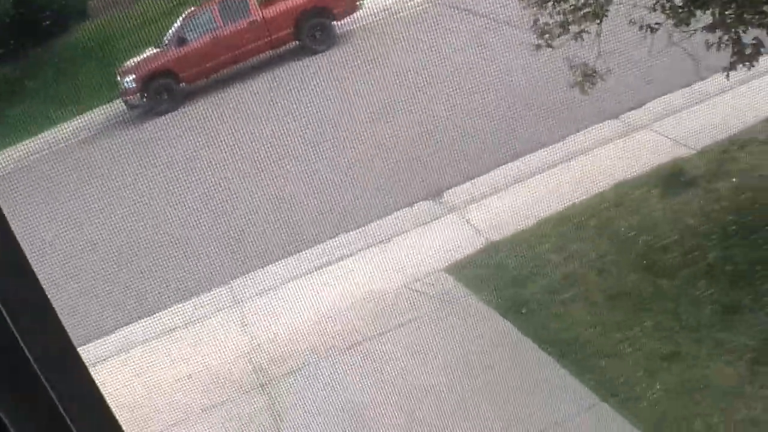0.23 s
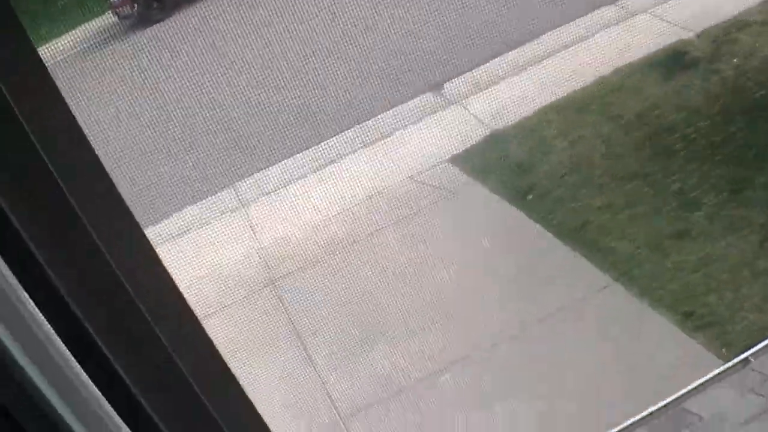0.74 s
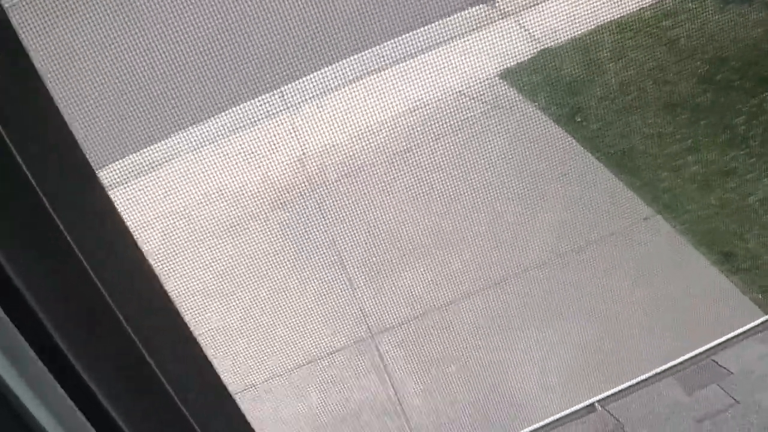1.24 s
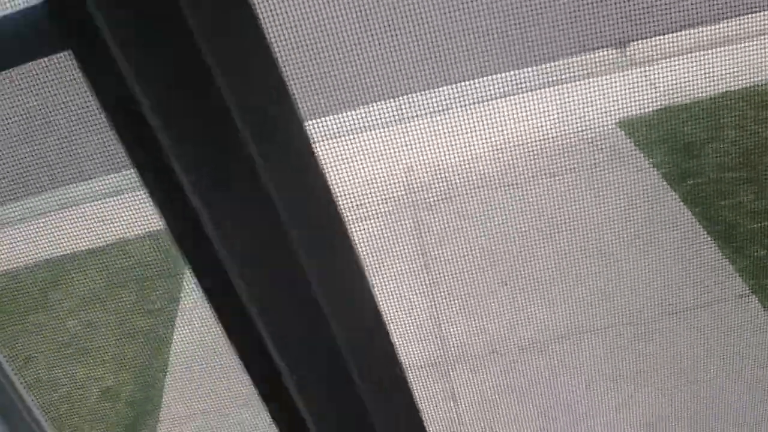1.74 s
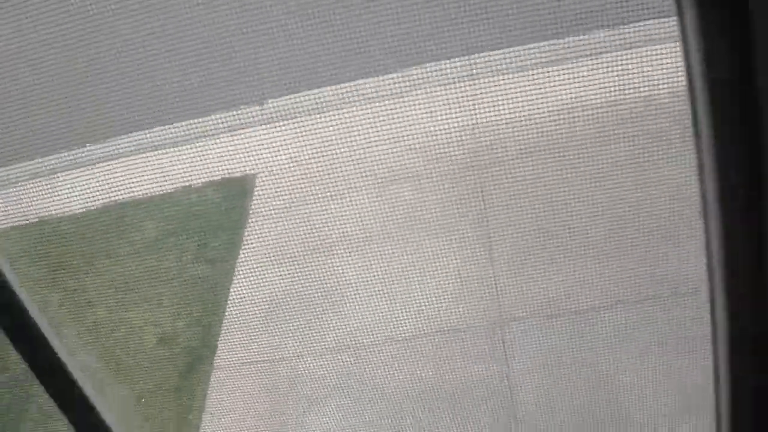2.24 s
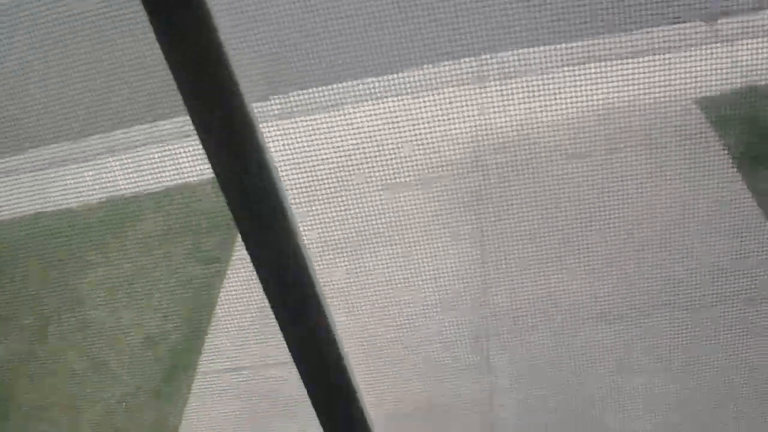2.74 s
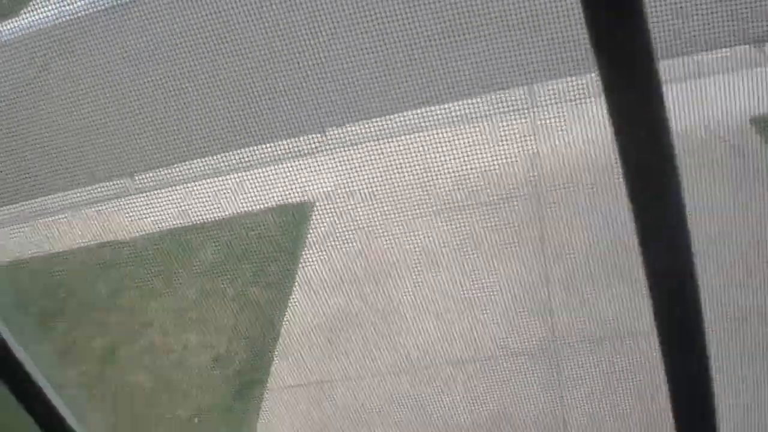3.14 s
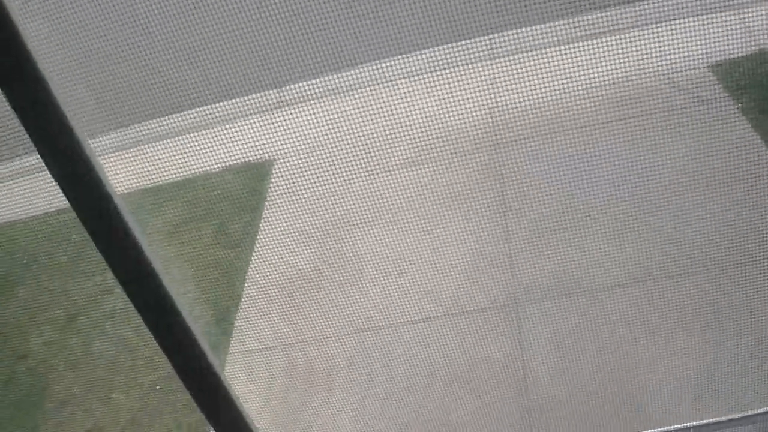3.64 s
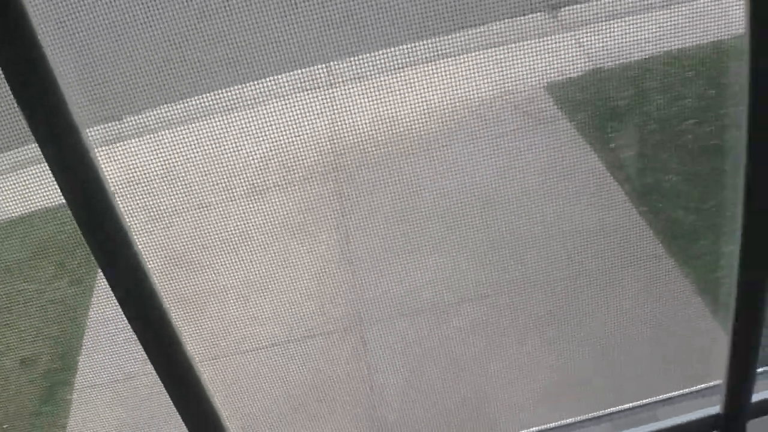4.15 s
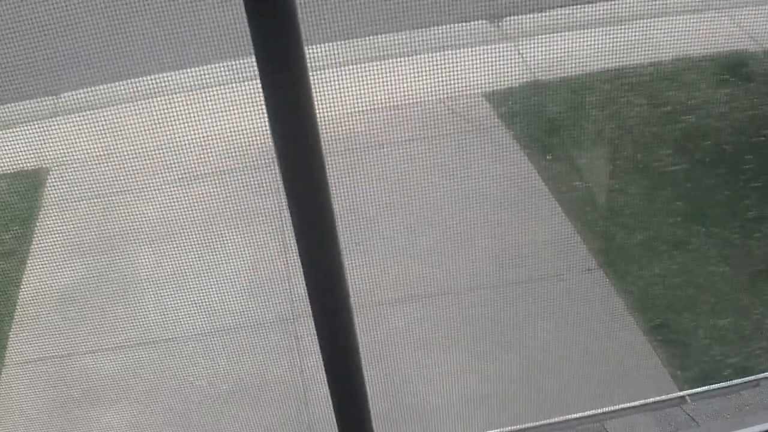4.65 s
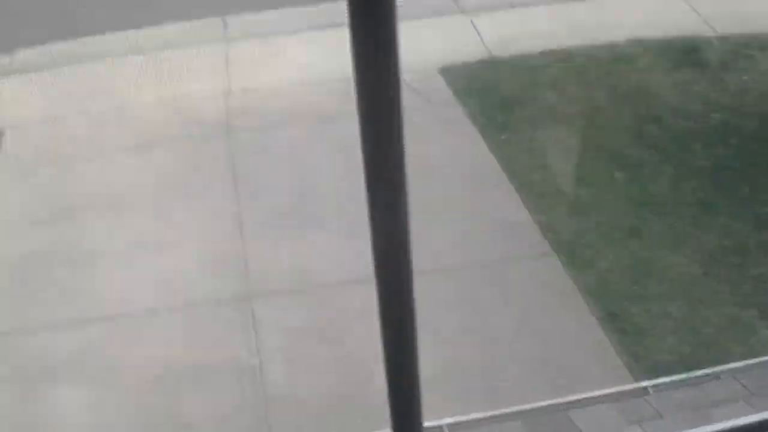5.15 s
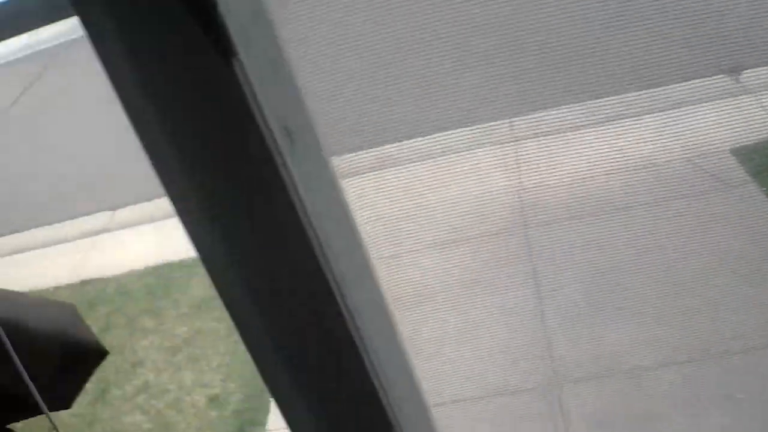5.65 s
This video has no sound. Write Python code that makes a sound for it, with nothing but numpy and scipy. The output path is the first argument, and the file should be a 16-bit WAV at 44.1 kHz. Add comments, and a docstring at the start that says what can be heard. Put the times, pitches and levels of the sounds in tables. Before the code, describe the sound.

A window sash hisses along its track with light clicks, bangs shut hard enough to distort, then its latch squeaks and clacks in an echoing room.

```python
"""A window sash rubs along its track as friction noise and bangs shut, and its latch is turned.
Knocks and ticks are dying noise bursts that excite the modes of the sash; the latch plate rings too.
Stick-slip friction makes the squeak of the lever and the brushing of the fingers.
A bare room echoes these sounds by sparse reflections, and the bang overloads the microphone.
Behind them lie a street murmur that sinks after the bang, a faint drone, a low rumble and hiss."""
import sys
import numpy as np
from scipy import signal
from scipy.fft import rfft, irfft, next_fast_len
from scipy.io import wavfile
from scipy.ndimage import uniform_filter1d

SR = 44100
rng = np.random.default_rng(int(sys.argv[2]) if len(sys.argv) > 2 else 0)


def generate_wav(sig):
    """Save sig (samples, or channels by samples) to the path in sys.argv[1] as 16-bit PCM at SR."""
    pcm = np.round(np.clip(np.atleast_2d(sig).T, -1, 1) * 32767).astype(np.int16)
    wavfile.write(sys.argv[1], SR, pcm)


N = 260756  # length [samples]

# Rub of the sash in its track: (time [s], gain [dB])
RUB = [(1.45, -54), (1.62, -41.5), (1.71, -42.5), (1.755, -48.5), (1.79, -41), (1.93, -41.5), (2.1, -42),
       (2.45, -45.5), (2.8, -43.5), (3.001, -43), (3.1, -46.5), (3.242, -43), (3.361, -42.5)]
# Spectrum of the weather-strip rub: (frequency [Hz], relative density [dB])
TRACK_SPECTRUM = [(590, -28), (1000, -3), (1800, -2), (1950, 2), (2240, 2.5), (3250, 4), (5530, 2),
                  (7860, -11), (13700, -20), (15000, -37)]
# Spectrum of the rumbling frame: (frequency [Hz], relative density [dB])
FRAME_SPECTRUM = [(59, -60), (100, -29), (157, -16), (301, -5), (479, -2), (564, -6), (734, -2.5),
                  (2000, -11.5), (2600, -39.5), (4400, -120)]
FRAME_GAIN_DB = -49.5
# The brightest band sinks along the track and wanders by an rms share of its frequency
BRIGHT_START_HZ, BRIGHT_SAG_HZ_PER_S, BRIGHT_WANDER = 5200, 240, 0.15


def slide():
    """Sliding friction: broadband rub and grit slips with a wandering bright band; the frame rumbles along."""
    rub_db, window = curves(RUB)
    start_s, end_s = RUB[0][0], RUB[-1][0]
    moved_s = np.clip(np.arange(N) / SR - start_s, 0, end_s - start_s)
    wander = slow_noise(4000, passes=2)
    bright_hz = (BRIGHT_START_HZ - BRIGHT_SAG_HZ_PER_S * moved_s) * (1 + BRIGHT_WANDER * wander)

    strip = noise(TRACK_SPECTRUM, patchy_db=2.0, flicker_db=0.9)
    track_grit = coloured(grit(per_s=330, spread_db=2.0), TRACK_SPECTRUM)
    rub = strip + 0.1 * track_grit
    rub = evened(rub + 0.42 * resonate(rub, bright_hz, 1300))
    frame = noise(FRAME_SPECTRUM, patchy_db=-0.3, flicker_db=-4.0)
    return window * (gain_of(rub_db) * rub + gain_of(FRAME_GAIN_DB) * frame)


# Knocks that shake the sash: (time [s], crack onset level [dB], centre [Hz],
# distance from centre to -6 dB [octaves], t60 [s], sash excitation [dB])
KNOCKS = [(.707, -21, 980, 1.05, 0.058, -30), (.734, -29, 400, 0.49, 0.14, -38),
          (1.449, -24, 895, 1.08, 0.15, -46), (3.364, -10.5, 1320, 1.06, 0.064, -11.5),
          (3.376, 1, 1269, .6, .1, -6), (3.382, 1, 2370, 0.96, 0.05, -1.5),
          (3.417, -10, 4060, 0.28, 0.062, -5.5), (3.455, -22, 3670, 0.71, 0.09, -9.5),
          (4.407, -45, 2500, 1.3, 0.059, -40), (4.812, -22, 1380, 1.07, 0.029, -32.5),
          (4.828, -9, 2300, 0.99, 0.063, -37), (5.893, -30.5, 726, 1.03, 0.13, -32.5)]
# Light ticks of grit and fittings: (time [s], onset level [dB], centre [Hz],
# distance from centre to -6 dB [octaves])
TICKS = [(0.17, -45.5, 4860, 0.24), (0.279, -52, 3000, 0.23), (0.639, -51, 5770, 0.19),
         (0.675, -47.5, 5600, 0.17), (0.733, -41, 5500, .28), (.911, -46, 5600, .35),
         (1.16, -34.5, 3300, .82), (1.257, -27.5, 4600, 0.36), (1.266, -32, 3700, 0.82),
         (1.288, -29, 3840, 0.76), (1.299, -25.5, 4440, 0.1), (1.448, -15.5, 4250, 0.52),
         (1.606, -33, 1580, 0.22), (1.635, -36, 1680, 0.2), (1.919, -34.5, 5500, 0.21),
         (2.016, -27, 3150, 0.71), (2.062, -28.5, 3670, 0.66), (2.189, -39, 4500, 0.73),
         (2.333, -35.5, 4630, 0.37), (2.535, -34, 1950, 0.56), (2.761, -30.5, 1828, 1),
         (2.825, -35.5, 4450, 0.13), (2.934, -28, 2650, .8), (3.183, -21.5, 3160, 0.82),
         (3.326, -27.5, 3690, 0.49), (3.367, -24, 8300, 0.083), (3.796, -31, 3200, 0.79),
         (4.423, -31, 1444, 0.29), (4.789, -30.5, 1200, 0.43), (5.484, -54.5, 2050, 0.46),
         (5.536, -57, 4950, .48), (5.609, -58, 4970, 0.67), (5.861, -50, 1650, 0.74)]
TICK_T60_S, TICK_RING_DB = 0.057, -25.5  # ticks die fast; sash excitation relative to the tick
# Modes of the sash: (frequency [Hz], relative level [dB], t60 [s])
SASH_MODES = [(97, -34.5, 0.091), (162, -32, 0.12), (202.8, -30, 0.24), (249, -16.5, 0.52),
              (289.8, -16.5, 0.2), (360.8, -6, 0.23), (433.6, -12.5, 0.15), (458, -21, 0.54),
              (558.7, -20, 0.2), (740, -18, 0.091)]
# Lever striking the latch plate: (time [s], plate excitation [dB])
CATCHES = [(4.787, -29), (4.811, -40), (4.828, -18.5)]
# Modes of the latch plate: (frequency [Hz], relative level [dB], t60 [s])
PLATE_MODES = [(275, -14, 0.16), (1120, -9, 0.065), (1214, 0.5, 0.085), (1312, 1, 0.064), (1420, -1, 0.049),
               (1488, -17, 0.039)]
SKIRT_DB, SKIRT_LOW_HZ = -13.5, 400  # body below each blow's band, and its lower corner
BURST_SAMPLES = 4096


def knocks():
    """Impulsive excitation: blows crack as dying noise bands and set sash and latch-plate modes ringing."""
    t, hz = np.arange(BURST_SAMPLES) / SR, np.fft.rfftfreq(BURST_SAMPLES, 1 / SR)
    crack, snap, push, tap = np.zeros((4, N + BURST_SAMPLES))
    ticks = [(*tick, TICK_T60_S, tick[1] + TICK_RING_DB) for tick in TICKS]
    blows = [*KNOCKS, *ticks]
    bursts = rng.standard_normal((len(blows), BURST_SAMPLES))

    for (s, db, centre_hz, octaves, t60, sash_db), burst in zip(blows, bursts):
        at = round(s * SR)
        span = slice(at, at + BURST_SAMPLES)
        distance = np.abs(np.log2((hz + 1) / centre_hz) / octaves)
        band = gain_of(-6 * distance ** 1.69)
        upper_slope = 1 + (hz / centre_hz) ** 4
        lower_slope = 1 + (SKIRT_LOW_HZ / (hz + 1)) ** 2
        band += gain_of(SKIRT_DB) / upper_slope / lower_slope

        attack = np.minimum(t / 0.0009, 1)
        shape = gain_of(db - 60 * t / t60) * attack
        crack[span] += evened(irfft(rfft(burst) * band)) * shape
        # The room is fed the same band as one even pulse, scaled to the energy of the blow
        pulse = np.roll(irfft(band), 128)
        snap[span] += pulse * np.linalg.norm(shape) / np.linalg.norm(pulse)
        push[at] += gain_of(sash_db)

    for s, db in CATCHES:
        tap[round(s * SR)] = gain_of(db)
    sash = signal.oaconvolve(push, ringing(SASH_MODES, spread_s=0.0017, detune=0.021))
    plate = signal.oaconvolve(tap, ringing(PLATE_MODES, spread_s=0.0064, detune=0.019))
    return crack[:N], snap[:N], (sash + plate)[:N]


def ringing(modes, spread_s, detune):
    """Modal superposition: clusters of neighbouring modes die away, building up as bending waves spread."""
    t = np.arange(SR // 2) / SR
    tones = np.zeros(len(t))
    for hz, db, t60 in modes:
        decay = gain_of(db - 60 * t / t60)
        for step in (0, *rng.uniform(-1.0, 1, size=3)):
            partial = np.sin(2 * np.pi * hz * (1 + detune * step) * t)
            tones += decay * partial / (1 + 2 * abs(step))
    return tones * (1 - np.exp(-t / spread_s))


# Each turn of the latch lever is a list of rows: (time [s], squeak gain [dB])
TURNS = [
    [(0, -53), (.08, -63.5), (.2, -67)],
    [(4.39, -78.5), (4.42, -45.5), (4.45, -56.5), (4.58, -61.5), (4.68, -57), (4.725, -62.5), (4.8, -45),
     (4.83, -38)],
]
# Upper resonances of the lever: (frequency [Hz], width [Hz], relative gain [dB])
RASP = [(2415, 44, 6), (3260, 73, 7.5), (4000, 110, 0.5), (5250, 180, 8)]
SQUEAK_HZ, SQUEAK_WIDTH_HZ = 1544, 33  # lowest resonance of the lever
SCRAPE_HZ, SCRAPE_WIDTH_HZ, SCRAPE_DB = 3800, 2200, -6.5  # broad scrape under the rasp
# The rasp gains on the squeak as the lever tightens
RASP_START_DB, RASP_RISE_DB_PER_S = -5.5, 29


def latch():
    """Stick-slip: slips under the turning lever excite its resonances over a dull scrape."""
    out, slips = np.zeros(N), grit(per_s=1500, spread_db=-0.5)
    waver = 1 + 0.0073 * slow_noise(2000)  # contact pressure shifts the pitches
    squeak = evened(resonate(slips, SQUEAK_HZ * waver, SQUEAK_WIDTH_HZ))
    dull_scrape = evened(resonate_twice(slips, 1220, 1800))
    squeak += 1.3 * dull_scrape

    rasp = np.zeros(N)
    for k, (hz, width, db) in enumerate(RASP):
        rasp += (-1) ** k * gain_of(db) * resonate(slips, hz * waver, width)
    broad_scrape = resonate(grit(per_s=1400, spread_db=1.5), SCRAPE_HZ, SCRAPE_WIDTH_HZ)
    rasp = evened(rasp) + gain_of(SCRAPE_DB) * evened(broad_scrape)

    for rows in TURNS:
        squeak_db, window = curves(rows)
        turned_s = np.clip(np.arange(N) / SR - rows[0][0], 0, 1)
        rasp_gain = gain_of(RASP_START_DB + RASP_RISE_DB_PER_S * turned_s)
        out += window * gain_of(squeak_db) * (squeak + rasp_gain * rasp)
    return out


# Fingers brushing the frame: (start [s], swell [s], fade [s], top gain [dB], centre [Hz])
BRUSHES = [(0, .01, 0.37, -57, 4400), (.62, 0.16, .05, -58.5, 5370), (3.76, 0.15, 0.041, -45.5, 5530),
           (4.41, 0.11, 0.15, -54, 4900)]
BRUSH_START_DB, BRUSH_END_DB = -3, -25  # relative to the top


def fingers():
    """Skin friction: fine slips fill one broad high band that swells and fades."""
    out, slips = np.zeros(N), grit(per_s=1600, spread_db=2.0)
    for start, swell, fade, top_db, hz in BRUSHES:
        top_s = start + swell
        db, window = curves([(start, BRUSH_START_DB), (top_s, 0), (top_s + fade, BRUSH_END_DB)])
        out += window * gain_of(top_db + db) * evened(resonate_twice(slips, hz, 3300))
    return out


# Decay of the room: (frequency [Hz], t60 [s])
ROOM_DECAY = [(100, 0.42), (350, 0.51), (1200, 0.67), (3500, 0.7), (7000, 0.56), (12000, 0.53)]
# Colour that the window recess gives the echo: (frequency [Hz], relative level [dB])
RECESS = [(300, 5.5), (800, 5), (1300, 1.5), (2500, -2), (3400, 0), (5200, 2.5), (6500, 1), (12000, -8)]


def room(x):
    """Reverberation: sparse reflections of random sign decay at a rate set by frequency."""
    taps = np.zeros(SR)
    at = np.arange(300, SR - 12, 12)  # one reflection in every 12 samples
    taps[at + rng.integers(0, 12, len(at))] = rng.choice([-1., 1.], len(at))
    hz, t, z = signal.stft(taps, SR, nperseg=256)
    colour_db = read(RECESS, hz)[:, None]
    decay_db = 60 * t / read(ROOM_DECAY, hz)[:, None]
    tail = signal.istft(z * gain_of(colour_db - decay_db), SR, nperseg=256)[1]
    return signal.fftconvolve(x, tail / np.linalg.norm(tail))[:N]


# Spectrum of the street murmur: (frequency [Hz], relative density [dB])
STREET_SPECTRUM = [(71, -41.5), (120, -13.5), (177, -5), (281, -1.5), (545, -6.5), (692, -4.5),
                   (1020, -9.5), (1460, -12), (2360, -21), (3260, -22), (7000, -27.5), (9100, -61),
                   (15400, -120)]
SHUT_S, SHUT_FADE_S = 3.37, 0.83
STREET_OPEN_DB, STREET_SHUT_DB = -52.5, -64.5
# Swells of a faint drone in the street: (middle [s], half length [s], top gain [dB])
DRONE_SWELLS = [(0.36, 0.15, -55), (1.027, 0.066, -54.5)]
DRONE_HZ, DRONE_WIDTH_HZ = 708, 42
# Low rumble: (time [s], gain [dB])
RUMBLE_GAIN = [(0, -67), (.6, -66.5), (1.35, -65.5), (1.55, -103), (2.9, -86.5), (3.4, -74), (4.05, -62),
               (4.3, -67), (4.9, -64.5), (5.91, -65.5)]
# Spectrum of the low rumble: (frequency [Hz], relative density [dB])
RUMBLE_SPECTRUM = [(15, -11.5), (30, -6.5), (90, -1.5), (170, -8.5), (215, -11.5), (245, 4.5), (280, -12.5),
                   (400, -40.5)]
# Spectrum of the microphone hiss: (frequency [Hz], relative density [dB])
HISS_SPECTRUM = [(880, -41.5), (1500, -7), (4640, -5.5), (6850, -9.5), (14000, -4.5), (14900, -7.5),
                 (15400, -36)]
HISS_GAIN_DB = -65


def background():
    """Filtered random noise: street murmur that sinks as the window shuts, drone, rumble, microphone hiss."""
    t = np.arange(N) / SR
    street_db = np.interp(t, [SHUT_S, SHUT_S + SHUT_FADE_S], [STREET_OPEN_DB, STREET_SHUT_DB])
    street = gain_of(street_db) * noise(STREET_SPECTRUM, patchy_db=-0.8, flicker_db=0.7)
    swells = sum(gain_of(db - 7.4 * ((t - s) / half) ** 2) for s, half, db in DRONE_SWELLS)
    drone = swells * evened(resonate_twice(rng.standard_normal(N), DRONE_HZ, DRONE_WIDTH_HZ))
    rumble_db, _ = curves(RUMBLE_GAIN)
    rumble = gain_of(rumble_db) * coloured(rng.standard_normal(N), RUMBLE_SPECTRUM)
    hiss = gain_of(HISS_GAIN_DB) * noise(HISS_SPECTRUM, patchy_db=1.0, flicker_db=0.8)
    return street + drone + rumble + hiss


def gain_of(db):
    """Logarithmic level: decibels to amplitude."""
    return 10 ** (np.asarray(db) / 20)


def evened(x):
    """Normalisation: scales to rms 1."""
    return x / np.sqrt(np.mean(x ** 2) + 1e-20)


def slow_noise(samples, passes=1):
    """Low-pass smoothing: white noise under a moving average, at rms 1."""
    x = rng.standard_normal(N)
    for _ in range(passes):
        x = uniform_filter1d(x, size=samples)
    return evened(x)


def read(points, hz):
    """Logarithmic frequency scale: interpolates a frequency table along it."""
    f, value = np.transpose(points)
    return np.interp(np.log(hz + 1), np.log(f + 1), value)


def curves(rows):
    """Envelope: table columns at every sample, and a window that is shut outside the table."""
    s, *columns = np.transpose(rows)
    t = np.arange(N) / SR
    since_start = t - s[0] + (s[0] <= 0)  # a table from time zero starts fully open
    window = np.clip(np.minimum(since_start, s[-1] - t) / 0.025, 0, 1)
    return [np.interp(t, s, c) for c in columns] + [window]


def resonate(x, hz, width):
    """Resonance by heterodyning: shifts hz to zero, smooths, and shifts back at gain 1."""
    turn = np.exp(2j * np.pi * np.cumsum(hz * np.ones(len(x))) / SR)
    r = np.exp(-np.pi * width / SR)
    return 2 * (turn * signal.lfilter([1 - r], [1, -r], x / turn)).real


def resonate_twice(x, hz, width):
    """Cascaded resonance: two equal passes steepen the skirts."""
    return resonate(resonate(x, hz, width), hz, width)


def noise(spectrum, patchy_db, flicker_db):
    """Short-time random spectra: drifting patches and a flicker shared by all bands."""
    frames = N // 128 + 5
    a, b, patches = rng.standard_normal((frames, 257, 3)).T
    patches = uniform_filter1d(patches, size=6, axis=0)  # across frequency
    patches = evened(uniform_filter1d(patches, size=20, axis=1))  # across time
    flicker = evened(uniform_filter1d(rng.standard_normal(frames), size=6))
    z = (a + 1j * b) * gain_of(patchy_db * patches + flicker_db * flicker)
    return coloured(signal.istft(z, nperseg=512, noverlap=384)[1][:N], spectrum)


def grit(per_s, spread_db):
    """Random impulse train: tiny slips of random sign and uneven size."""
    size = gain_of(spread_db * np.minimum(rng.exponential(1, N), 5))
    sign = rng.choice([-1., 1.], N)
    return evened(size * sign * (rng.random(N) < per_s / SR))


def coloured(x, spectrum):
    """Linear filtering: weights the spectrum by a table, then scales to rms 1."""
    size = next_fast_len(N)
    weights = gain_of(read(spectrum, np.fft.rfftfreq(size, 1 / SR)))
    return evened(irfft(rfft(x, size) * weights, size)[:N])


def scene():
    """Superposition: near sounds, their echo in the room, and the background."""
    crack, snap, ring = knocks()
    rubs = slide() + latch() + fingers()
    to_room = gain_of(-13.5) * snap + gain_of(-9.0) * ring + gain_of(-14.0) * rubs
    direct = crack + gain_of(-2.5) * ring + rubs
    return (direct + room(to_room) + background())[None]


def record(dry):
    """Transduction: the microphone loses deep bass, the input clips at full scale, a low-pass limits the band."""
    thinned = signal.sosfilt(signal.butter(2, 65, "high", fs=SR, output="sos"), dry)
    clipped = np.clip(thinned, -1, 1)
    low_pass = signal.firwin(511, 15200, window=("kaiser", 9), fs=SR)
    return signal.oaconvolve(clipped, low_pass[None], "same")


dry = scene()
out = record(dry)
generate_wav(out)
```